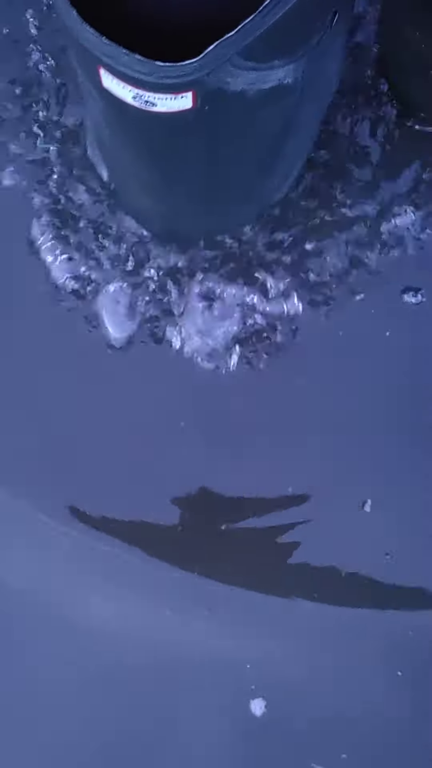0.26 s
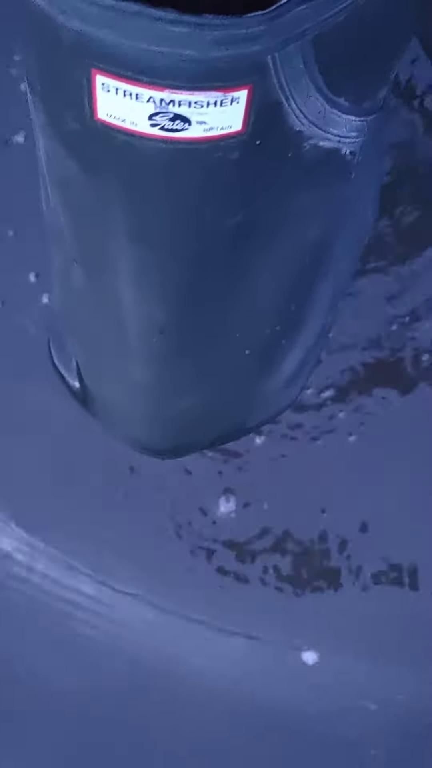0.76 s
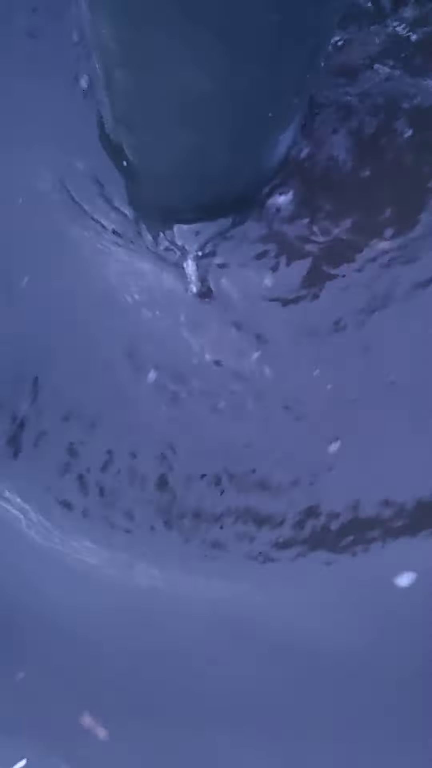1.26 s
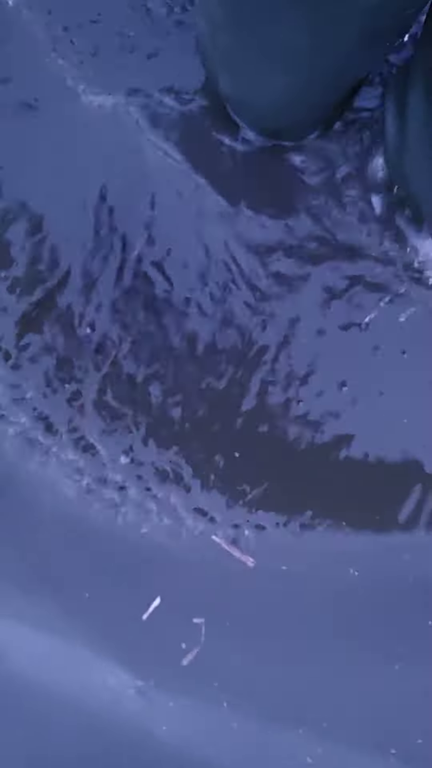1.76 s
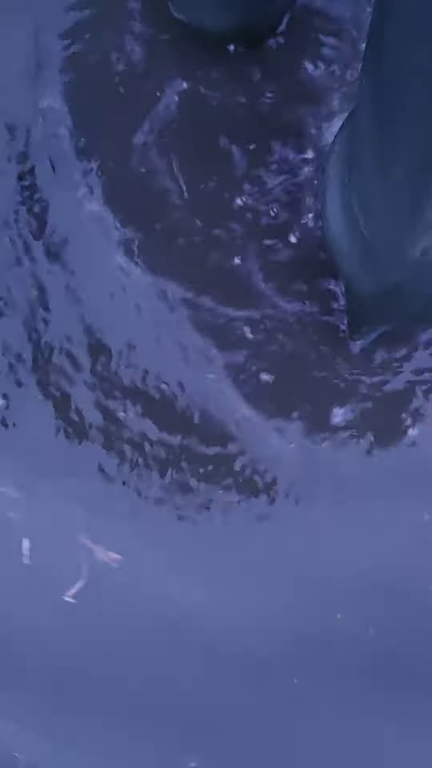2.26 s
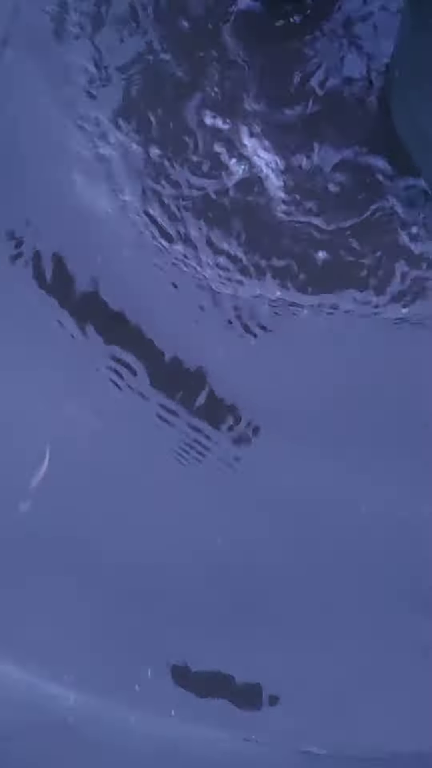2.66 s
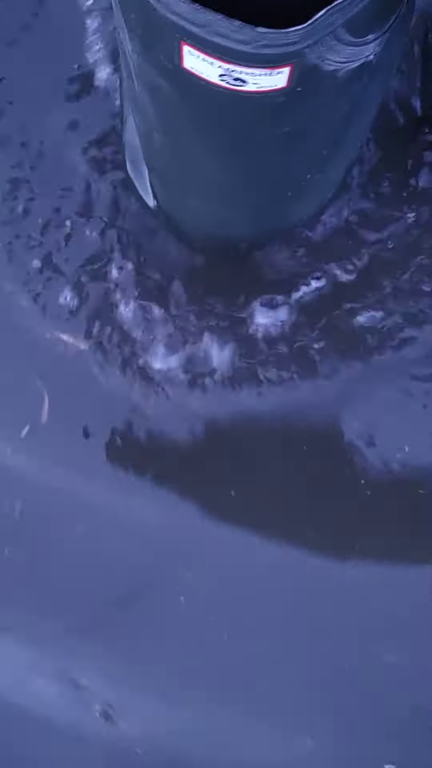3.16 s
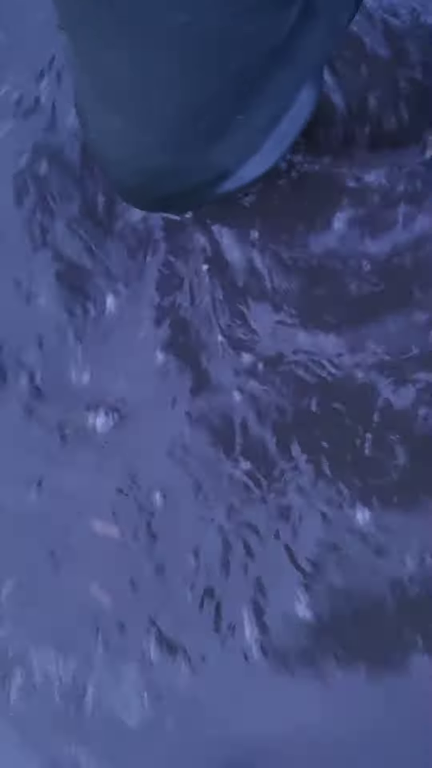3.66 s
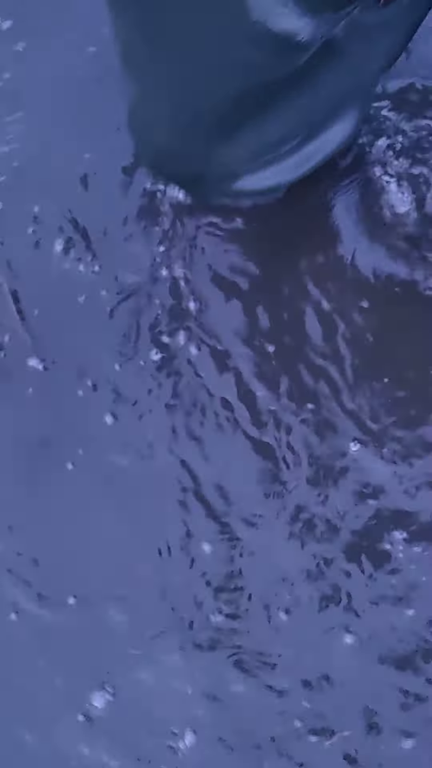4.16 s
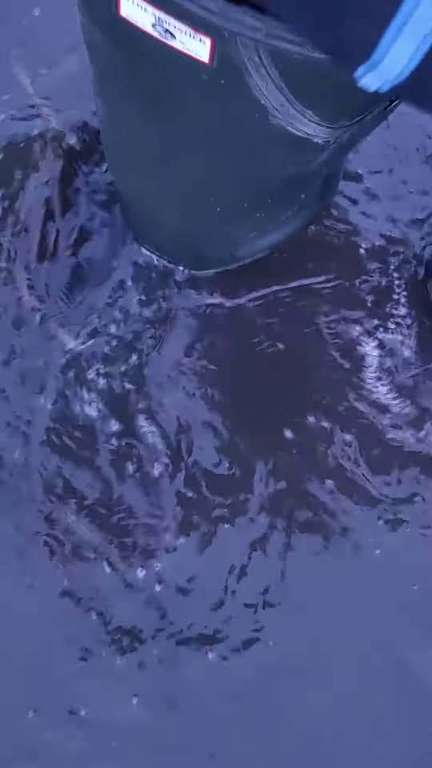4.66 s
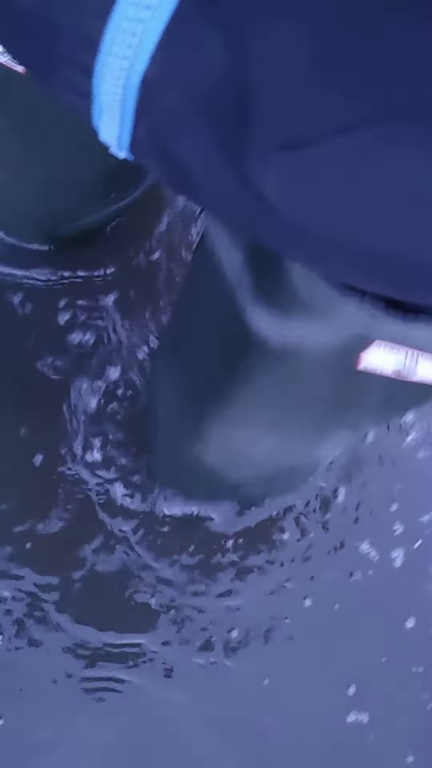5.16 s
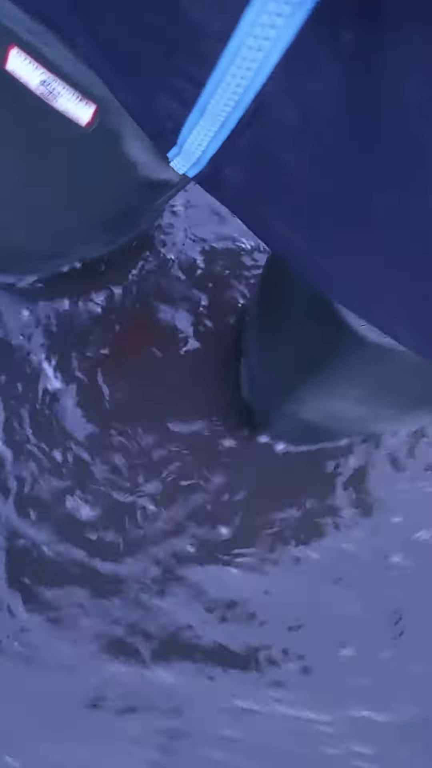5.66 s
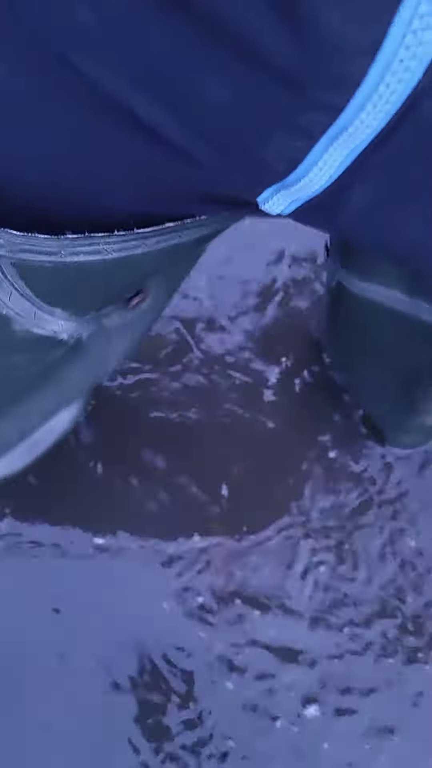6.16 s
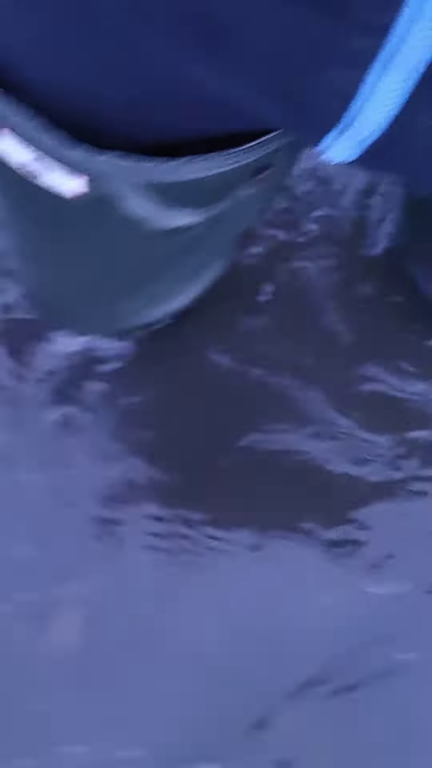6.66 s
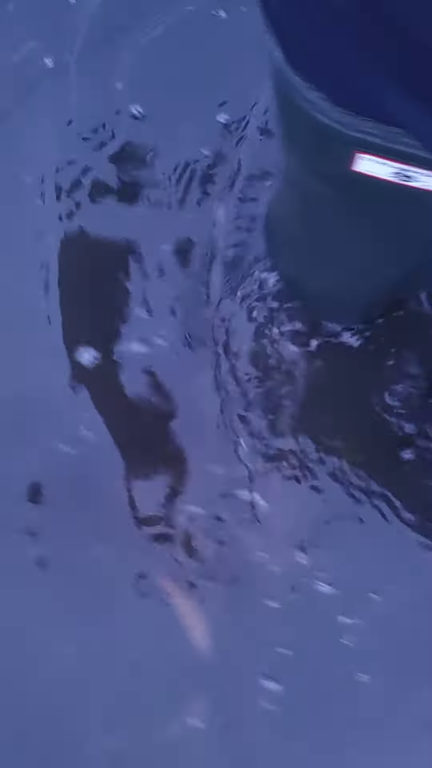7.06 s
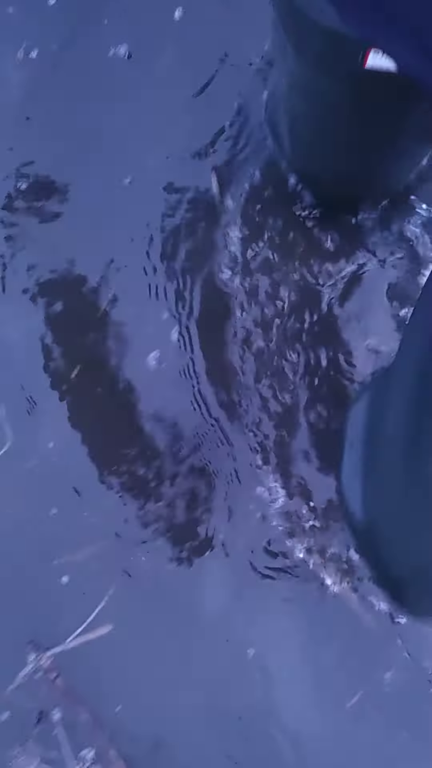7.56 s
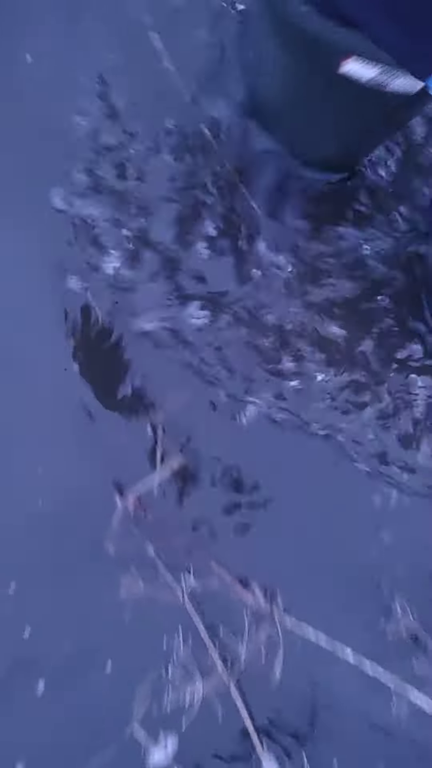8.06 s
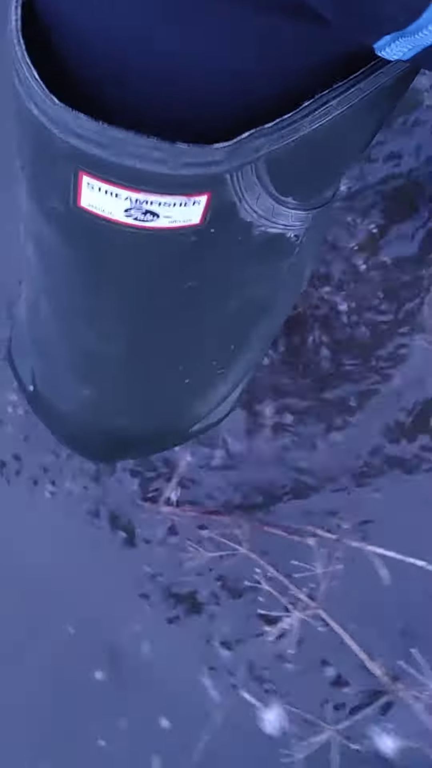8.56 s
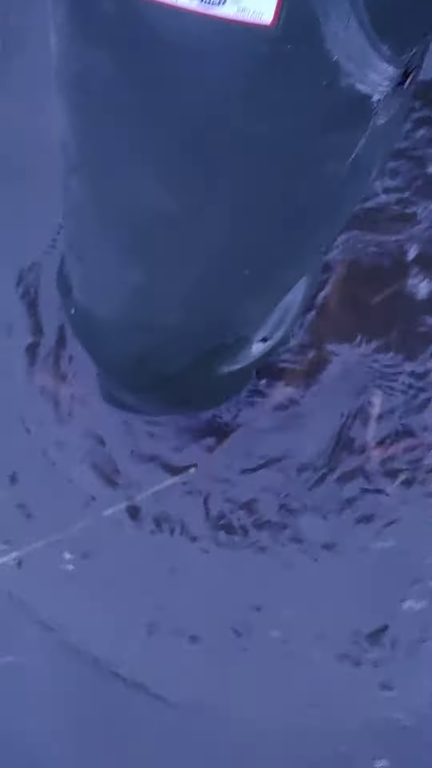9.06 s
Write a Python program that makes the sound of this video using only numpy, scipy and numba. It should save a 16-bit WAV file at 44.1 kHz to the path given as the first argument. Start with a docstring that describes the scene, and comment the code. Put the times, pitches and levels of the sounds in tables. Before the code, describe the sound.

Two close microphones outdoors pick up rubber boots wading in shallow water over a faint steady hiss. From 0 to 1.1 seconds, low wind rumbles with lumpy thumps, strongest near 0.6, while a first slosh gurgles and sprays and fabric brushes softly. Further uneven sloshes come around 0.8, 1.7, 2.4, 3.0, 3.4 and 3.8, with short bubble plops and bright droplet ticks; the wind is now weak. A small one at 4.3 ends this run. From 4.6 to 7, water is nearly calm, with a few ticks, and jacket and trousers swish in clear short strokes. At 7.0 to 7.3 a hollow briefly hums, rising then dropping, slightly right, as a big slosh begins. Denser splashing, bubbles and sharp drips continue at 7.7 and 8.2, with a small wind bump near 8.25. After 8.7 it quietens to faint trickles and hiss.

```python
"""Light wind rumbles and bumps at two close microphones, over a quiet outdoor hiss.
A jacket and trousers swish nearby: noise shaped stroke by stroke. Rubber boots wade through
shallow water: thousands of small rings gurgle and spray, droplets tick, larger bubbles ring and
glide in pitch. Later a hollow behind a boot hums: noise through a moving resonance."""
import sys
import numpy as np
from scipy import signal
from scipy.io import wavfile
from scipy.ndimage import uniform_filter1d
from numba import njit

SR = 44100
rng = np.random.default_rng(int(sys.argv[2]) if len(sys.argv) > 2 else 0)


def master(y):
    """Save y as 16-bit WAV."""
    cut = np.clip(np.atleast_2d(y).T, -1, 1)
    pcm = np.round(cut * 32767)  # scale
    wavfile.write(sys.argv[1], SR, pcm.astype(np.int16))


N = 410130  # length of the scene in samples

# Left-right values are left minus right, so a positive one leans left. Levels of colours are relative.
# Strength of the wind: t/s, level/dB
WIND_STRENGTH = [(0.0, -32), (0.05, -27), (0.07, -24), (0.28, -39.5), (0.57, -27.5), (0.62, -19),
                 (0.7, -28), (0.9, -22), (2.07, -50.5), (2.15, -36.5), (2.35, -56), (2.48, -36.5),
                 (3.7, -45), (4.04, -37.5), (4.17, -56), (4.9, -40.5), (5.75, -52), (7.17, -50), (7.2, -38),
                 (7.82, -45), (8.24, -25.5), (8.34, -35), (8.81, -39), (8.86, -29.5), (9.09, -59.5),
                 (9.3, -62)]
# Colour of the wind rumble: f/Hz, level/dB
WIND_SPECTRUM = [(12, -47), (24, -38), (51, 8), (80, 0), (150, -12), (193, -13), (400, -26.5), (520, -63),
                 (880, -120)]
# Single eddies that push the diaphragm in: t/s, peak level/dB, f/Hz
WIND_BUMPS = [(0.009, -18.5, 103), (0.081, -15.5, 98), (0.11, -13.5, 148), (0.239, -18, 116),
              (0.4, -23, 87.4), (0.507, -18.5, 86), (0.613, -7.5, 109), (0.646, -17.5, 78.0),
              (0.833, -17, 226), (0.852, -15, 94), (0.875, -12, 120), (0.905, -12.5, 129),
              (0.963, -19.5, 183), (1.02, -11.5, 87.5), (1.094, -11.5, 90), (1.316, -33, 83),
              (1.56, -20.5, 97), (1.66, -21, 104), (2.142, -22, 136), (2.945, -27, 71.6),
              (4.043, -25.5, 77), (5.235, -29.0, 74.6), (5.265, -29, 64.6), (7.21, -16.5, 159),
              (7.301, -17, 143), (7.48, -24.5, 129), (8.247, -24.5, 70.4), (8.871, -25.5, 79.5),
              (9.02, -29.5, 223)]
WIND_TILT = -1.66  # dB per octave, when the wind level is -31.5 dB
TILT_PER_DB = 0.1175  # change of that tilt for each dB of wind level

# Colour of the quiet outdoors: f/Hz, level/dB
AIR_SPECTRUM = [(18, -39), (36, -9), (75, 3), (745, -9), (1680, -7.5), (3710, -42), (7350, -10),
                (9080, -37), (15000, -18), (16200, -55)]
AIR_DB = -58.5

# Cloth rubs cloth: start t/s, length/s, level/dB, crispness/dB, fullness/dB, left-right/dB
CLOTH_STROKES = [(0.04, 0.12, -48.5, -9.5, -6, 1), (0.2, 0.2, -47, -4, -6.5, 1),
                 (0.42, .1, -56, -2, -22, -1), (0.72, .16, -53, -9.5, -1.5, 0.5),
                 (0.9, 0.34, -64.5, -3, 4, -1), (1.34, 0.064, -52.5, -14, -3, 1),
                 (1.46, 0.3, -49, -10.5, -4, 3.5), (1.8, 0.19, -55, -2, -7, 2),
                 (1.95, .17, -53.5, -4, -0.5, 2), (2.12, 0.19, -54.5, -4, -3, 0.5),
                 (2.39, 0.17, -58.5, 0, 6, 1), (2.6, 0.13, -65.5, -4, 6.5, 3),
                 (2.93, 0.11, -53.5, -12, -1, 1.5), (3.15, 0.51, -74, 9, -6, 1),
                 (3.72, 0.38, -60.5, 0, -1, 1), (4.05, 0.25, -61, -4, -6.5, -2),
                 (4.26, 0.23, -51.5, -11, -7, 1.5), (4.45, 0.36, -60.5, 3, -2.5, 1),
                 (4.6, 0.12, -38.5, -7, -5, 2), (4.72, .16, -41, -7.5, -7.5, 2.5),
                 (4.86, 0.29, -41.5, -8, -7.5, 3), (5.33, .14, -49, -6, -1.5, 2.5),
                 (5.5, 0.094, -61.5, 2, 4, 2), (5.65, .14, -44.5, -9, -5.5, 2.5),
                 (5.81, .18, -48.5, -4, -6.5, 1), (5.98, 0.18, -50, -2, -5.5, 1.5),
                 (6.08, .2, -41.5, -6, -7, 2), (6.33, .14, -49.5, -8, -6.5, 2.5),
                 (6.49, 0.1, -57, -4, 3, 0.5), (6.645, 0.16, -40, -8, -6, 1.5),
                 (7.06, 0.19, -44.5, -7.5, -1, 3), (7.28, 0.23, -46, -7, -6.5, -2),
                 (7.6, 0.27, -46, -6.5, -12, 1), (7.9, 0.3, -49.5, -9, 2.5, -2),
                 (8.0, 0.11, -42, -1.5, -7, 0.5), (8.16, 0.22, -42.5, -6.5, -9, 1.5),
                 (8.38, 0.14, -42.5, -7, -11.5, 0), (8.5, 0.14, -57.5, -3, 1.5, 0),
                 (8.75, 0.092, -63, -17, -3, 1), (8.96, 0.12, -61, -17, 0, 2)]
# Colour of the cloth: f/Hz, level/dB
CLOTH_SPECTRUM = [(71, -56), (120, 2), (236, 2), (328, -0.5), (495, -2.5), (974, -8), (1170, -6),
                  (1530, -3), (2260, -12.5), (2660, -11), (3620, -24.5), (7130, -17.5), (8930, -40),
                  (12700, -28), (16200, -31)]
# How alike the cloth sounds left and right: f/Hz, likeness (1 = the same)
CLOTH_LIKENESS = [(60, 0.99), (130, 0.97), (290, 1), (640, 0.6), (1410, 0.82), (3100, 0.94), (6820, 0.88),
                  (15000, 1)]
# Level at both ends of a stroke [dB], flatness of its top, cloth between strokes [dB]
STROKE_EDGE_DB, STROKE_SQUARE, REST_DB = -11.5, 2.4, -74.5
WIDEN = 0.17  # largest share of likeness that the swish loses while the water is churned

# A boot sets small bubbles loose: start t/s, length/s, level/dB, spray above that/dB (both relative)
BOOT_SLOSHES = [(0.1, 0.57, -49, 2.5), (0.82, 0.45, -48, -5), (1.74, 0.41, -47, 2), (2.39, 0.25, -47.5, 1),
                (3.02, 0.28, -46.5, 2.5), (3.34, .3, -52, 3), (3.78, 0.3, -46, 1), (4.28, 0.19, -57, 0),
                (7.1, 0.67, -44.5, 3), (7.72, 0.46, -46, 4.5), (8.18, .46, -46, -1),
                (8.74, 0.35, -57.5, -2), (9.21, 0.04, -80, -19)]
# Colour of the small bubbles and the spray: f/Hz, level/dB
WATER_SPECTRUM = [(250, -9.5), (600, -1.5), (1200, 1.5), (1740, 12), (2400, 3.5), (3600, -0.5), (7000, 9.5),
                  (9000, 5), (15000, 12)]
# Level at both ends of a slosh [dB], flatness of its top, still water [dB]
SLOSH_EDGE_DB, SLOSH_SQUARE, CALM_DB = -10.5, 3.25, -64

# Droplets and bursting films: t/s, relative level/dB, ring f/Hz, left-right/dB
DROPLETS = [(0.1532, -32, 7300.0, -9.5), (0.2448, -32.5, 6200.0, 2), (0.396, -29.5, 13400, 1.0),
            (0.632, -41, 6960, -1.0), (0.9107, -37.5, 6450, -2), (0.95, -36.5, 6000, -1),
            (1.784, -35, 5970, -0.5), (1.872, -30, 6000, -2.5), (2.4158, -26.5, 6850, -1.0),
            (2.4635, -33, 4420, -8), (2.5031, -37, 5630, -1), (2.506, -37, 4730, -7),
            (2.562, -41, 4900.0, -2), (2.589, -43, 4650, -1), (2.5912, -34, 4530, -1),
            (2.6914, -39, 6400, -2.5), (3.05, -29.5, 7840, -2.0), (3.068, -38, 8000, 1),
            (3.112, -32, 13000.0, -6.5), (3.1947, -38, 4600.0, -5), (3.2155, -39, 7550, 11),
            (3.2732, -41, 6820, 1.5), (3.3098, -33, 6370, -3.5), (3.4088, -39, 7450, -9),
            (3.528, -38, 7100.0, -2.0), (3.5854, -38, 7400, -0.5), (3.59, -38.5, 5700, -5.5),
            (3.687, -35, 11800, -1), (3.7201, -31, 12800, -2), (3.8689, -36, 12100, -1),
            (3.951, -37.5, 5940, 1), (3.954, -39, 13800.0, -1), (3.9726, -32, 11100, 0.0),
            (3.9994, -48, 6500.0, 7), (4.1238, -40, 10600, -2.0), (4.193, -35.5, 7200.0, 1),
            (5.1893, -35, 13200, -2.5), (5.265, -36, 7500, -0.5), (5.6224, -43.5, 6840, 1),
            (5.7872, -38, 6900, -1), (5.9074, -47, 6460, 9), (6.5156, -35, 11900, 0.0),
            (7.3574, -35, 6200.0, 0), (7.3945, -33, 6800.0, -1.0), (7.478, -31, 7960, -3.5),
            (7.4963, -30.0, 14600.0, -2.0), (7.533, -34, 6500.0, -0.5), (7.5687, -50, 13200, -7.0),
            (7.6183, -35, 6850, 1.0), (7.648, -28.5, 6600, -13.5), (7.8702, -32, 14400, -9),
            (7.9127, -44, 6540, -7), (7.9385, -20, 13200, -1.5), (8.3226, -36, 7550, -19),
            (8.4023, -21.5, 8500, -1), (8.4157, -27, 5640, -2), (8.4518, -25, 6700, 1),
            (8.7768, -44, 5900.0, 4), (9.0929, -54, 6800, -23), (9.134, -51, 7170, -11),
            (9.182, -56, 7460, -26)]
# Trapped bubbles: t/s, level before fading/dB, start f/Hz, glide per length/octaves, length/ms, left-right/dB
LARGE_BUBBLES = [(0.157, -30, 2800, 0.16, 3.4, -3), (0.173, -32.5, 642, -0.085, 14, 2),
                 (0.196, -21.5, 693, -0.17, 8.7, 0), (0.288, -28, 440, 0.53, 24, -2),
                 (0.302, -31, 1940.0, -0.39, 33, -2.0), (0.314, -36, 705, 0.9, 24, 1),
                 (0.337, -35, 1790, -0.34, 46, -1), (0.363, -30, 1065, -0.044, 11, 2),
                 (0.384, -19, 2170, 0.096, 1.8, -3), (0.482, -38.5, 733, -0.079, 29, 1.0),
                 (0.501, -35, 1680, 0.28, 5.1, 7), (0.515, -32.5, 1183, -0.07, 14, -1),
                 (0.879, -37, 745, 0.37, 16, -1), (0.908, -37, 830, 0.2, 14, 0),
                 (0.941, -35, 1180, -0.013, 10, 0), (0.96, -28.5, 1650.0, 0.16, 4.1, -2),
                 (0.987, -21.5, 2600, 0.021, 0.89, -3), (1.012, -33.5, 1400, 0.56, 15.5, -5),
                 (1.037, -32, 546, 0.13, 8.5, 0.0), (1.152, -23, 596, 0.1, 1.7, 0),
                 (1.194, -29, 2050.0, -0.034, 2.3, -2.0), (1.759, -30.5, 1830.0, 0.087, 5.7, -1),
                 (1.77, -26.5, 2330, -0.43, 11.5, 2), (1.772, -27.5, 563, 0.11, 23, 1),
                 (1.782, -15, 3040, -0.17, 0.57, -11), (1.788, -34.5, 1640, 0.0, 11, 5),
                 (1.796, -32, 1020, 0.64, 8, 0), (1.909, -41, 1690, 0.24, 35, -5),
                 (1.922, -37.5, 2400, 0.081, 17, -6), (2.087, -31.5, 1700, 0.02, 7, -1.0),
                 (2.417, -28, 2130, 0.049, 5.1, -6), (2.456, -27, 1980, 0.26, 6.8, -4.0),
                 (2.465, -34, 4070, -0.005, 2.6, -16), (2.465, -26, 1460.0, 0.037, 6.5, -1),
                 (2.554, -33, 572, -0.04, 18, -1), (2.552, -29, 1095, 0.039, 7, -2),
                 (2.554, -20.5, 1646, 0.24, 10.0, 0.0), (2.634, -38, 1840.0, -0.09, 11, -5),
                 (3.072, -27.5, 925, 0.96, 23, -1), (3.092, -29, 1597, 0.26, 8.2, -9),
                 (3.115, -39, 430, 0.23, 31, -2), (3.17, -42, 470, 0.5, 35, 0),
                 (3.201, -34, 1860, 0.12, 4.6, -4), (3.226, -32.5, 780, 0.5, 27, 1),
                 (3.241, -32, 1310, -0.057, 15, 1), (3.36, -44.5, 840, 0.15, 18, 2),
                 (3.372, -54, 640, 0.24, 37, 0), (3.445, -40.5, 684, 0.23, 42, -3),
                 (3.527, -45, 612, 0.4, 33, 0), (3.463, -30.5, 1760.0, 0.13, 3.6, -3),
                 (3.819, -30.5, 3360.0, -0.027, 3.3, -4), (3.848, -23, 2460.0, 0.055, 1.5, 2),
                 (3.866, -27.5, 1760, 0.2, 8.9, -5), (3.889, -25.5, 1910, -0.17, 8.6, -5.0),
                 (3.903, -29, 2220, 0.59, 4.1, -4), (3.907, -22, 1820.0, 0.19, 1.2, -3.0),
                 (4.051, -30, 1930, 0.38, 1.8, -2), (4.091, -36, 1920, 0.042, 9.2, -1.0),
                 (4.092, -28, 3200, 0.063, 3.1, -9), (4.117, -26.5, 1600, 0.21, 1.3, -1),
                 (4.225, -36, 1960, 0.22, 3.2, -7), (4.336, -30.5, 2300, -0.026, 2.3, -5),
                 (4.345, -32.5, 3200, 0.19, 2.3, -15), (5.9085, -19, 1360, -0.071, 1.4, 5.5),
                 (7.338, -31.5, 470, 0.27, 14, -6), (7.359, -27, 1560, 0.14, 11, -6),
                 (7.377, -26.5, 1780, 0.35, 5.0, -7), (7.467, -28, 3220, -0.2, 7.6, -7.5),
                 (7.47, -38, 560, 0.36, 9, -4.0), (7.479, -32, 1360, 0.0064, 8.7, 1),
                 (7.532, -27, 1210, 0.63, 12, -1.0), (7.561, -28, 1530.0, 0.027, 3.7, -2),
                 (7.607, -20, 1680, -0.65, 2.1, 1), (7.605, -20, 2150.0, -0.1, 1.7, -1),
                 (7.608, -26, 1000, 0.36, 25, 0), (7.617, -27, 2100.0, -0.065, 2.3, -2.0),
                 (7.62, -30, 2760.0, 0.011, 2, 4), (7.618, -15.5, 1680, -0.3, 1.6, -1),
                 (7.644, -24, 1740.0, 0.1, 1.3, 2.0), (7.652, -26, 1590, 0.005, 5.5, 1),
                 (7.676, -21.5, 2880, -0.0086, 1.1, 8), (7.781, -36, 2600, -0.15, 13, -2.0),
                 (7.814, -22, 2500, -0.029, 1.3, -5), (7.938, -25, 3330, -0.041, 2.3, -12),
                 (7.945, -37.5, 1030, -0.39, 20.0, -1.0), (8.019, -30.5, 3270.0, 0.3, 4.4, -6),
                 (8.057, -37, 4120, -0.045, 24, -3), (8.102, -24.5, 1790, 0.064, 3.6, -1.0),
                 (8.323, -12.5, 1670, 0.071, 2.7, -4), (8.42, -25, 1640, -0.18, 5.5, -2.0),
                 (8.428, -21, 1990.0, -0.0021, 2.5, 1), (8.45, -35, 2310, 0.66, 14, -10),
                 (8.45, -26, 780, -0.12, 5.7, -6), (8.541, -37, 1820.0, -0.03, 17, 2),
                 (8.648, -22.5, 500, -0.64, 1.3, 1.0), (8.913, -32.5, 1510, 0.09, 1.6, 0),
                 (8.918, -22.5, 420, -0.23, 1.9, 6), (9.014, -34, 2790, 0.061, 7.9, -9),
                 (9.231, -43.5, 1830, 0.11, 16, -7)]
LAG_PER_DB = 0.4  # samples by which the quieter side hears a ring later, per dB of lean

# A hollow behind the boot narrows and collapses: t/s, resonance f/Hz, level/dB
HOLLOW_PATH = [(7.03, 170, -55), (7.07, 220, -38), (7.12, 326, -46), (7.18, 510, -32), (7.21, 800, -35),
               (7.24, 560, -35), (7.28, 406, -35), (7.32, 380, -39)]

EDGE_HZ = 16050  # upper limit of the whole sound


def gain_of(db):
    """Turn decibels into a factor for the wave."""
    return 10 ** (np.asarray(db) / 20)


def evened(x):
    """Scale to an rms of 1."""
    return x / np.sqrt(np.mean(x ** 2) + 1e-20)


def read(points, hz):
    """Read a colour table, with straight lines along log frequency."""
    f, value = np.transpose(points)
    return np.interp(np.log(hz + 1), np.log(f + 1), value)


def follow(rows, t):
    """Follow each column of a table over time, with straight lines between rows."""
    s, *columns = np.transpose(rows)
    return [np.interp(t, s, c) for c in columns]


def arches(rows, t, edge_db, square, rest_db):
    """Events swell and fade in an arch: their summed level in dB, and other columns weighted by power."""
    start, length, db, *columns = np.transpose(rows)[:, :, None]
    from_middle = abs(2 * (t - start) / length - 1)
    power = gain_of(db + edge_db * from_middle ** square) ** 2
    total = power.sum(0) + gain_of(rest_db) ** 2
    return [10 * np.log10(total)] + [(power * c).sum(0) / total for c in columns]


def hiss(field_db, same, size):
    """Stereo noise from random short-time spectra; field_db(hz, t) sets level, same(hz, t) likeness."""
    hop = size // 4
    hz = np.fft.rfftfreq(size, 1 / SR)[:, None]
    t = np.arange(N // hop + 5) * hop / SR
    a, b, c, d = rng.standard_normal((len(t), len(hz), 4)).T
    likeness = np.clip(same(hz, t), -1, 1)
    left = a + 1j * b
    right = likeness * left + np.sqrt(1 - likeness ** 2) * (c + 1j * d)
    spectra = np.array([left, right]) * gain_of(field_db(hz, t))
    return signal.istft(spectra, nperseg=size, noverlap=size - hop)[1][:, :N] / np.sqrt(2 * size / 3)


def per_bin(colour, lo_hz, hi_hz, size):
    """Level shift in dB that brings a band of the colour to an rms of 1."""
    hz = np.fft.rfftfreq(size, 1 / SR)
    band = hz[(hz > lo_hz) & (hz < hi_hz)]
    return -10 * np.log10(np.sum(gain_of(read(colour, band)) ** 2) * 2 / size)


def patches(hz, t, wide, long):
    """Random blotches over frequency and time, with a spread of 1."""
    field = rng.standard_normal((len(t), len(hz))).T
    return evened(uniform_filter1d(uniform_filter1d(field, wide, 0), long, 1))


@njit
def rings(n, start, lag, left, right, step, glide, length, rise, fade, shape):
    """Add up gliding, dying sine waves in stereo; times are in samples."""
    out = np.zeros((2, n))
    for k in range(len(start)):
        phase = 0.
        a, b = start[k] + max(-lag[k], 0), start[k] + max(lag[k], 0)
        for i in range(min(int(2.5 * length[k]) + 8, n - max(a, b))):
            u = i / length[k]
            phase += step[k] * 2 ** (glide[k] * min(u, 1.5))
            v = np.sin(phase) * (1 - np.exp(-i / rise)) * np.exp(-fade * u ** shape)
            out[0, a + i] += left[k] * v
            out[1, b + i] += right[k] * v
    return out


def ring(s, db, hz, octaves, ms, pan_db, rise_ms, fade, shape):
    """Tones that start suddenly, glide in pitch and die; the quieter side hears them later."""
    start = (s * SR).astype(np.int64)
    lag = np.round(LAG_PER_DB * pan_db).astype(np.int64)
    left, right = gain_of(db + pan_db / 2), gain_of(db - pan_db / 2)
    return rings(N, start, lag, left, right, 2 * np.pi * hz / SR, octaves,
                 ms * SR / 1000, rise_ms * SR / 1000, fade, shape)


def wind():
    """Wind makes a lumpy rumble, nearly alike on both sides, and eddies push the diaphragm in."""
    def field(hz, t):
        db = follow(WIND_STRENGTH, t)[0]
        tilt = WIND_TILT + TILT_PER_DB * (db + 31.5)
        lumps = 4.6 * patches(hz, t, wide=4, long=2)
        colour = read(WIND_SPECTRUM, hz) + per_bin(WIND_SPECTRUM, 25, 160, size=2048)
        return colour + db + tilt * np.log2((hz + 10) / 80) + lumps

    def same(hz, t):
        return .999 - (hz / 900) ** 2

    rumble = hiss(field, same, size=2048)
    t, bumps = np.arange(N) / SR, np.zeros(N)
    for s, db, hz in WIND_BUMPS:
        u = (t - s) * hz  # time in cycles
        near = abs(u) < 3
        bumps[near] -= gain_of(db) * np.cos(2 * np.pi * u[near]) * np.exp(-(u[near] / 0.48) ** 2)
    return rumble + bumps


def air():
    """The quiet outdoors is steady noise, less alike left and right towards the treble."""
    def field(hz, t):
        return read(AIR_SPECTRUM, hz) + 0 * t

    def same(hz, t):
        return 300 / (hz + 300)

    return gain_of(AIR_DB) * evened(hiss(field, same, size=1024))


def swish():
    """Fine fibres slip too densely to count; crispness shifts the top, fullness the bottom."""
    def field(hz, t):
        db, crisp_db, full_db, pan_db = arches(CLOTH_STROKES, t, STROKE_EDGE_DB, STROKE_SQUARE, REST_DB)
        top = np.clip((hz - 8000) / 1500, 0, 1)
        bottom = np.clip((4200 - hz) / 1800, 0, 1)
        flicker = 1.32 * evened(uniform_filter1d(rng.standard_normal(len(t)), size=3))
        flicker = flicker + 1.4 * patches(hz, t, wide=8, long=14)
        colour = read(CLOTH_SPECTRUM, hz) + top * (crisp_db + 9.0) + bottom * full_db
        middle = colour + db + flicker
        lean = pan_db / 2 * np.clip(hz / 700, 0, 1)  # the bass leans less
        return np.array([middle + lean, middle - lean]) + per_bin(CLOTH_SPECTRUM, 5000, 8000, size=512)

    def same(hz, t):
        churn_db = arches(BOOT_SLOSHES, t, SLOSH_EDGE_DB, SLOSH_SQUARE, CALM_DB)[0]
        churned = np.clip((churn_db + 60) / 16, 0, 1)
        return read(CLOTH_LIKENESS, hz) * (1 - WIDEN * churned * np.clip(hz / 1500, .2, 1))

    return hiss(field, same, size=512)


def swarm(count, lo_hz, hi_hz, cycles, spread_db, largest, flies, glide, rise_ms, db):
    """Thousands of small bubbles or drops ring, louder as the water is churned (flies = 1 for spray)."""
    when, pitch, size, long, side, bend = rng.random((count, 6)).T
    s = when * N / SR
    hz = lo_hz * (hi_hz / lo_hz) ** pitch
    churn_db, spray_db = arches(BOOT_SLOSHES, s, SLOSH_EDGE_DB, SLOSH_SQUARE, CALM_DB)
    size_db = -spread_db * np.log(size + abs(largest))  # "largest" keeps the loudest in bounds
    level_db = db + churn_db + 45 + flies * spray_db + read(WATER_SPECTRUM, hz) + size_db
    ms = 1000 * cycles * (0.23 + 1.48 * long) / hz
    return ring(s, level_db, hz, glide * (bend - .25), ms, 18 * (side - .6), rise_ms, fade=1.765, shape=0.64)


def gurgle():
    """Small bubbles under the water ring low and fairly long."""
    return swarm(count=4500, lo_hz=348.6, hi_hz=3795, cycles=11.46, spread_db=5.5, largest=0.088,
                 flies=0, glide=0.467, rise_ms=0.39, db=-46.5)


def spray():
    """Flying drops make higher, shorter rings."""
    return swarm(count=4000, lo_hz=2600, hi_hz=15570, cycles=4.1, spread_db=5.5, largest=0.034,
                 flies=1, glide=0.18, rise_ms=0.17, db=-45)


def ticks():
    """A droplet lands or a film bursts: a bare click and a very short ring."""
    s, db, hz, pan_db = np.transpose(DROPLETS)
    tone = ring(s, db + 1.5, hz, 0 * s, 6000 / hz + .4, pan_db, rise_ms=0.024, fade=2.2, shape=1.85)
    click = ring(s, db + 11.5, 0 * s + 9000, 0 * s - 1.2, 0 * s + 0.11, pan_db,
                 rise_ms=0.0066, fade=2.8, shape=1.8)
    return tone + click


def bubbles():
    """Each larger trapped bubble rings alone, gliding up or down in pitch as it dies."""
    return ring(*np.transpose(LARGE_BUBBLES), rise_ms=0.077, fade=1.14, shape=1.4)


def near_echoes(water):
    """Boots, legs and the water surface throw short echoes back."""
    echo = np.zeros((2, 1200))
    echo[:, 0] = 1  # the direct sound
    fall_db = -30 - 60 * np.arange(1140) / SR / 0.053  # falls 60 dB in 0.053 s
    echo[:, 60:] = gain_of(fall_db) * rng.standard_normal((2, 1140))
    return signal.oaconvolve(water, echo, axes=1)[:, :N]


def hollow():
    """Noise of churned water is heard through the hollow's moving resonance, stronger on the right."""
    t = np.arange(N) / SR
    hz, db = follow(HOLLOW_PATH, t)
    turn = np.exp(2j * np.pi * np.cumsum(hz) / SR)
    r = np.exp(-np.pi * 70 / SR)  # resonance 70 Hz wide
    # shift the moving resonance to 0 Hz, smooth the noise there and shift it back
    tone = (turn * signal.lfilter([1 - r], [1, -r], rng.standard_normal(N) / turn)).real
    open_now = (t > HOLLOW_PATH[0][0]) * (t < HOLLOW_PATH[-1][0])
    return evened(tone) * gain_of(db) * open_now * gain_of([[-2], [2]])


def scene():
    """Mix wind, outdoor air, cloth and water with its echoes."""
    water = gurgle() + spray() + ticks() + bubbles()
    return wind() + air() + swish() + near_echoes(water) + hollow()


def record(dry):
    """Cut off the highest treble with a steep filter."""
    low_pass = signal.firwin(511, EDGE_HZ, window=("kaiser", 9), fs=SR)
    return signal.oaconvolve(dry, low_pass[None], "same")


dry = scene()
out = record(dry)
master(out)
```